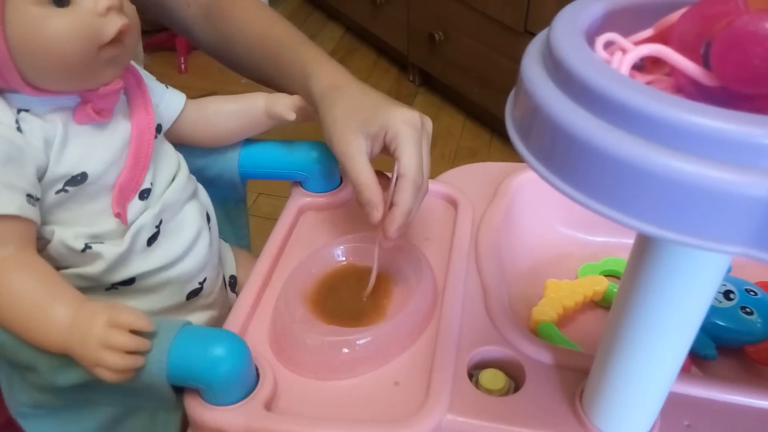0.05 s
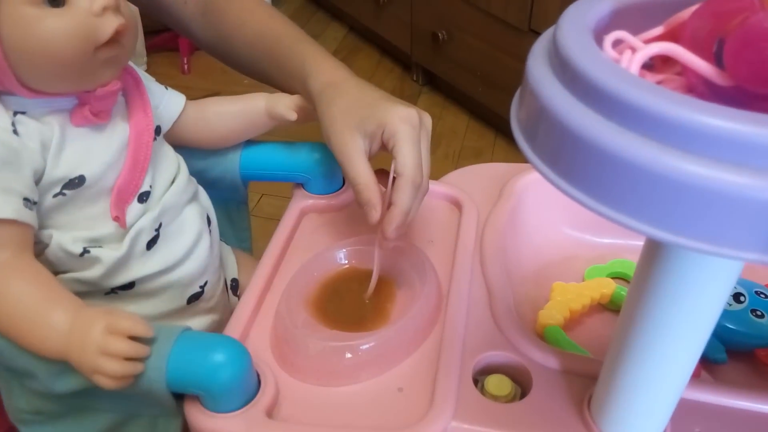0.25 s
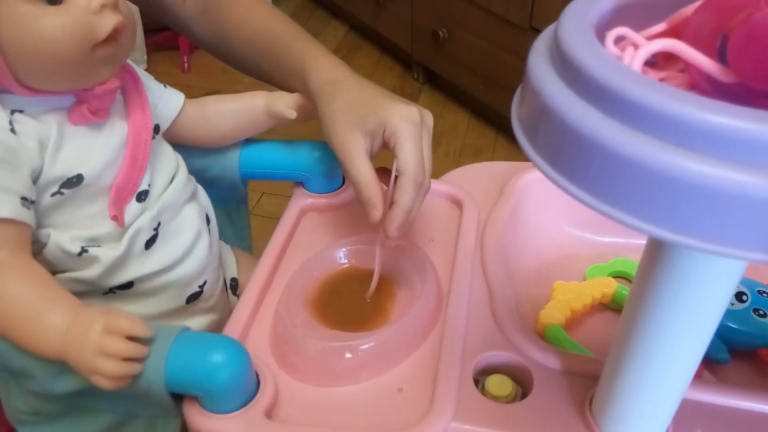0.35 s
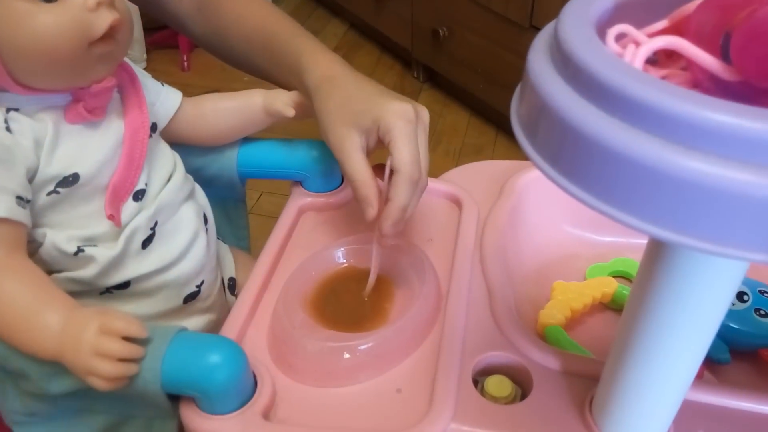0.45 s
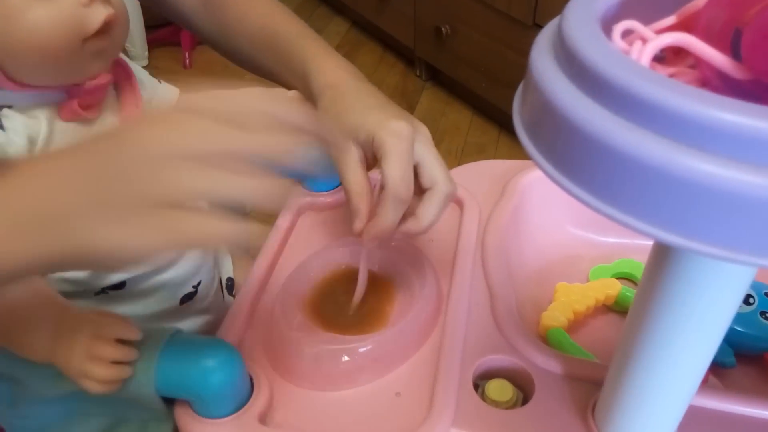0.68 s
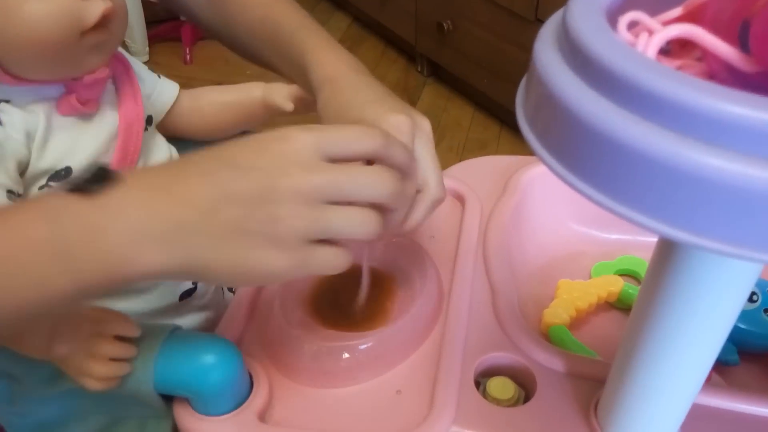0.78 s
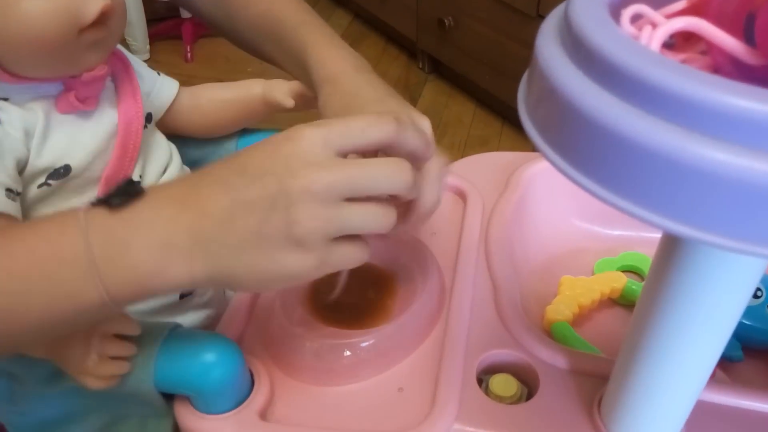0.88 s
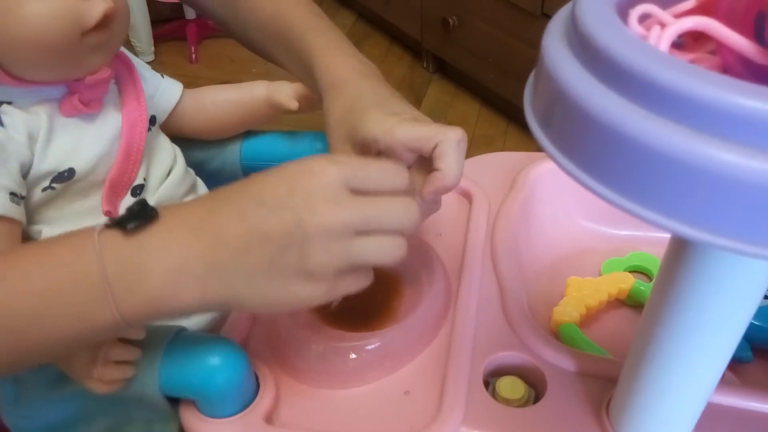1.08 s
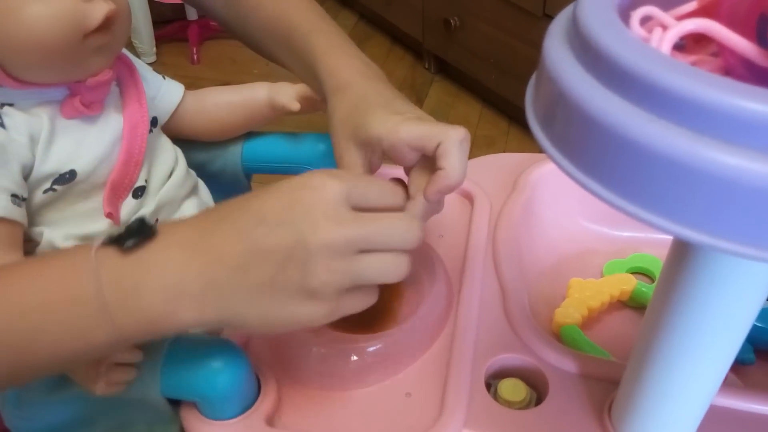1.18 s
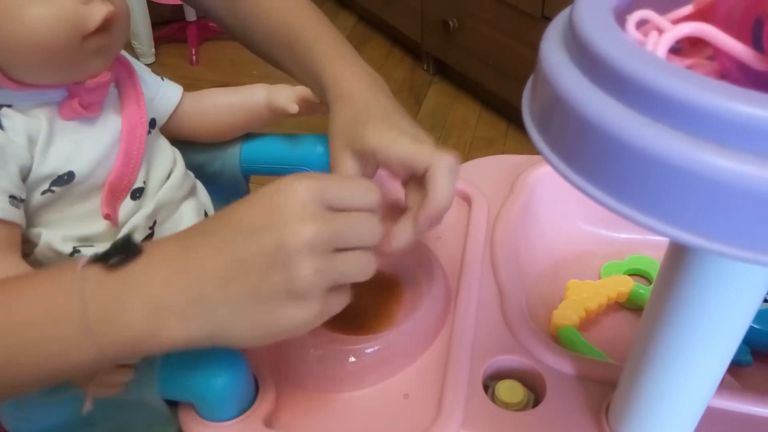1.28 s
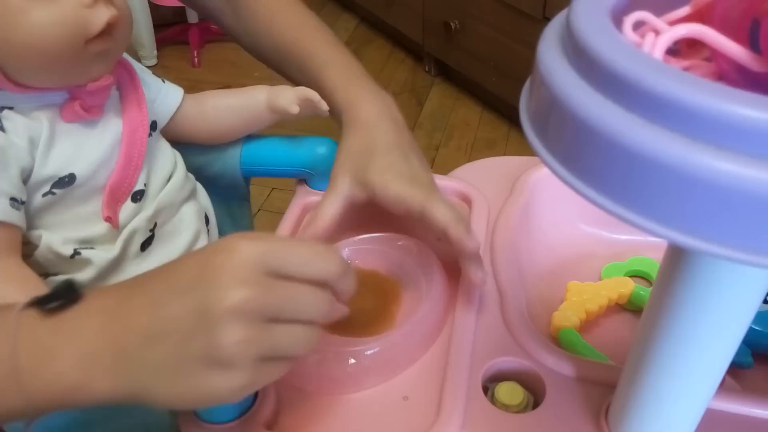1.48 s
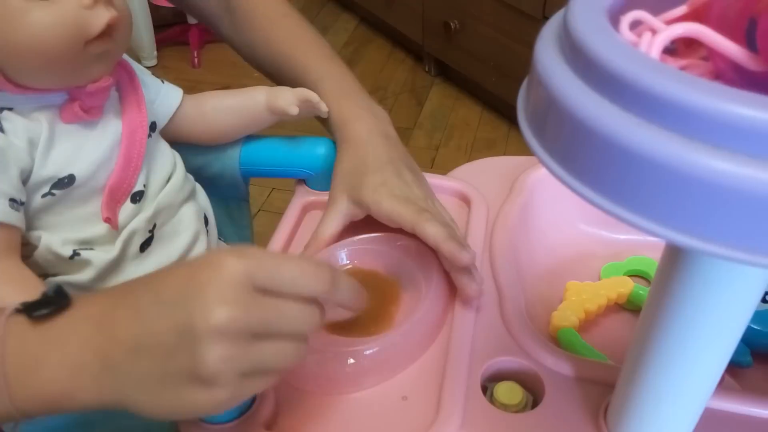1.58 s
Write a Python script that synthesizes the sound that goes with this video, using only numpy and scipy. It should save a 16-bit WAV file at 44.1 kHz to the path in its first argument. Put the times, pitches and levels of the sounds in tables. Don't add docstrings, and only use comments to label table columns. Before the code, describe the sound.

A plastic spoon knocks hard twice in a small plastic bowl, then scrapes and ticks lightly

```python
import sys
import numpy as np
from scipy import signal
from scipy.io import wavfile

SR = 44100
rng = np.random.default_rng(int(sys.argv[2]) if len(sys.argv) > 2 else 0)


def nominal_scale(level):
    x = np.asarray(level, float) / 20
    return 10 ** x


def materialize(psi):
    bounded = np.clip(np.atleast_2d(psi).T, -1, 1)
    quanta = np.round(bounded * 32767).astype(np.int16)
    wavfile.write(sys.argv[1], SR, quanta)


N = 72765

# hz, level_db (per Hz)
ROOM_AIR = [(22, -23), (35, 5), (60, 0), (100, -3), (160, -6), (250, -10.5), (500, -20.5), (1500, -31.5)]
# hz, level_db (per Hz)
MIC_HISS = [(1500, -1), (2500, 5), (4000, 0.5), (5600, 11.5), (7000, 3.5), (9000, -14), (16000, -4.5)]
# hz, likeness (0-1)
STEREO_LIKENESS = [(40, 0.1), (150, 0.7), (500, 0.6), (2000, 0.02), (5000, 0.1), (12000, .0)]
# pitch_hz, width_hz, level_db, wander_hz
WHINE_TONES = [(5616, 39, -74.5, 27), (11250, 35, -80.5, 220), (14050, 99, -88, 22)]
# hz, level_db, t60_s
ROOM_ECHO = [(60, -19, 0.35), (130, -22.5, 0.5), (252, -18, 0.42), (530, -18, 0.32), (750, -18, 0.23),
             (1200, -16.5, 0.28), (3000, -20, 0.41), (6060, -16, 0.34), (9900, -25, 0.17)]
# start_s, length_s, level_db, wall_db (bowl wall against rim)
STROKES = [(-0.01, 0.23, -74.5, -33), (0.312, 0.091, -56, -33), (0.666, 0.067, -69, -17.5),
           (0.741, 0.084, -61.5, -4.5), (0.831, 0.042, -76, -9.5), (0.885, 0.073, -57, -12),
           (0.95, 0.043, -58, -10.5), (0.984, 0.042, -67.5, -17.5), (1.32, 0.23, -79, -2),
           (1.569, 0.11, -77.5, 15), (1.639, 0.019, -76, 12.5)]
# pitch_hz, width_hz, level_db
RIM_PEAKS = [(4700, 197, 2.5), (5960, 510, 1.5), (6460, 480, 0), (7200, 540, 0)]
# pitch_hz, width_hz, level_db
WALL_PEAKS = [(950, 390, 10.5), (1170, 180, -1.5), (1784, 96, 12.5), (2040, 370, 10), (3330, 3300, 7.5)]
# start_s, peak_db, hardness_hz (of the contact), crack_db, pan_db (left over right)
TAPS = [(.2295, -31.5, 855, 12.5, -18), (0.233, -22.5, 1900, 14, -5.5), (0.369, -9.5, 3500, 4.5, -5),
        (0.3704, -26.5, 4016, 6, -3), (0.3722, -17.5, 2520, -33.5, 13), (0.6275, -39, 710, 7, -2),
        (0.8863, -48.5, 800, -19.5, -7.5), (.9145, -65.5, 5050, 3.5, -8), (1.341, -56, 904, -16, -4.5),
        (1.395, -51, 704, -25.5, -6), (1.5826, -57.5, 5900, 10, 9), (1.5838, -47, 6040, 6, 4),
        (1.5855, -42.5, 2000, -21, -12), (1.6345, -47.5, 3000, 3, -11.5)]
# pitch_hz, level_db, t60_s
BOWL_MODES = [(387, -19, 0.0027), (461, 2.5, 0.022), (564, -1, 0.028), (716, -5.5, 0.012), (922, -2, 0.013),
              (1190, -23, 0.012), (1260, -14.5, 0.005), (1746, 6, 0.006), (2000, -3.5, 0.018),
              (2300, -6, 0.017), (2710, -6.5, 0.016), (3075, 2, 0.0069), (4900, -0.5, .004),
              (5370, -4, 0.0023)]
# middle_s, peak_db, pitch_hz, length_s,
# pan_db (left over right)
THUDS = [(0.2323, -13, 460, 0.0049, -6), (0.2337, -8, 205.6, 0.0099, -5.5),
         (0.3746, -18.5, 149, 0.02, -6.5), (.376, -20.5, 522, 0.014, -6.5), (0.411, -33.5, 130, 0.052, -3),
         (0.395, -35, 490.5, 0.04, 4), (0.438, -38, 507.4, 0.051, -1), (0.42, -37, 539, 0.049, -3),
         (0.251, -26, 258, 0.017, 1), (0.284, -45, 90, 0.024, -1), (.05, -55.5, 72, .1, -17),
         (0.118, -53.5, 58, 0.032, -15.5), (.684, -50, 130, 0.01, -3), (0.6182, -43, 240, 0.0098, -2),
         (.455, -24.5, 141, 0.0081, -3.5), (.5155, -31, 144, 0.0096, -10), (0.578, -47.5, 103, 0.072, -6.5),
         (0.6269, -33.5, 178, 0.0079, -9), (0.63, -49, 1190, 0.0075, 4.5), (.634, -44, 500, 0.0073, -8),
         (0.663, -48, 111, 0.029, -9.5), (0.937, -48.5, 62, 0.0337, -12.5),
         (1.1346, -44.5, 308, 0.0067, 16), (1.136, -40, 126.6, 0.011, 21), (1.346, -51.5, 458, 0.01, -7),
         (1.393, -51, 444, 0.018, -7.5), (1.407, -44.5, 230, 0.036, -6), (1.44, -48.5, 219, 0.016, -11.5),
         (1.487, -49, 220.5, 0.043, -10.5), (1.522, -57, 130, 0.021, -30.5), (1.607, -44, 109, 0.0093, -4),
         (1.643, -65, 84.05, 0.014, -47)]
# middle_s, peak_db, pitch_hz, length_s,
# pan_db (left over right)
TICKS_AND_RINGS = [(.2310, -33.5, 5700, .003, -0.5), (0.2363, -22.5, 6500, .003, -0.5), (0.2354, -29, 2760, .004, -3),
                   (.2356, -21.5, 1625, 0.0032, -5.5), (.3705, -25.5, 4900, .004, -10), (0.3719, -34, 3203, .006, -1),
                   (0.413, -47, 1045, .008, 1.5), (.416, -40, 3130, .008, 0), (.6285, -42, 6700, .0018, 1),
                   (0.641, -58, 1140, .006, -12), (0.646, -49, 450, .008, 1), (0.747, -59.5, 4730, .006, -8),
                   (.766, -49, 6250, .005, -2.5), (.770, -61, 2150, .014, -16), (0.776, -49, 6660, .004, -3),
                   (.887, -52.5, 1054, .006, 2.5), (.894, -47.5, 6200, .004, -1.5), (0.911, -52.5, 4560, 0.0094, 5.5),
                   (0.957, -49, 6500, .005, -2.5), (.968, -67.5, 4360, .005, 4.5), (0.992, -69.5, 4700, .008, 3.5),
                   (1.344, -60.5, 1050, 0.0077, -4), (.917, -61, 480, 0.029, -6), (.30, -47.5, 560, 0.019, -3),
                   (0.391, -29, 270, .03, -4.5), (1.417, -52.5, 340, .02, -4.5), (1.408, -62.5, 630, .02, -5.5),
                   (1.49, -62, 487, .015, -1.5), (1.5830, -36, 3000, 0.00027, -4), (1.5840, -36, 3400, 0.00037, -1.5),
                   (1.5855, -44, 1500, 0.00093, 0.5), (1.395, -58, 1800, .001, -5),
                   (0.383, -36.5, 918.5, 0.026, -4.5), (0.395, -41, 708, 0.054, -1.5), (.50, -51.5, 703, 0.062, -3),
                   (0.2329, -29, 1260, 0.005, -4), (1.6352, -50, 3500, 0.00036, -8), (1.636, -67.5, 4660, .003, -5)]


def rms_one(x):
    return x / np.sqrt(np.mean(x ** 2) + 1e-20)


def at_hz(points, hz, column=1):
    points = np.array(points)
    return np.interp(np.log(hz), np.log(points[:, 0]), points[:, column])


def sides(pan_db):
    return nominal_scale(np.array([[pan_db / 2], [-pan_db / 2]]))


def drift(rate_hz):
    pole = np.exp(-2 * np.pi * rate_hz * 40 / SR)
    steps = rng.standard_normal(N // 40 + 2002)
    slow = signal.lfilter([1], [1, -2 * pole, pole * pole], steps)[2000:]
    return np.interp(np.arange(N) / 40, np.arange(len(slow)), rms_one(slow - slow.mean()))


def resonance(x, hz, width_hz):
    r = np.exp(-np.pi * width_hz / SR)
    poles = [1, -2 * r * np.cos(2 * np.pi * hz / SR), r * r]
    return signal.lfilter([(1 - r * r) / 2, 0, (r * r - 1) / 2], poles, x)


def noise_bands():
    edges = 22 * 2 ** np.arange(0, 9.6, 0.5)
    white = rng.standard_normal((2, 2, N))
    for k, (low, high) in enumerate(zip(edges, edges[1:])):
        band = signal.butter(2, [low, high], "band", fs=SR, output="sos")
        mid, side = signal.sosfilt(band, white[k % 2])
        hz = np.sqrt(low * high)
        alike = at_hz(STEREO_LIKENESS, hz)
        yield hz, np.sqrt(1 + alike) * mid + np.sqrt(1 - alike) * side * [[1], [-1]]


def air():
    low, hiss = 0, 0
    together = drift(1.0)
    for hz, band in noise_bands():
        if hz < 1500:
            low = low + nominal_scale(at_hz(ROOM_AIR, hz) + together + 2 * drift(16.0)) * band
        else:
            hiss = hiss + nominal_scale(at_hz(MIC_HISS, hz) + 0.54 * drift(10)) * band
    return nominal_scale(-58.5) * sides(-6) * rms_one(low) + nominal_scale(-69) * sides(-4) * rms_one(hiss)


def whine():
    fuzz_share = 0.35
    wander = np.sin(np.pi * np.arange(N) / SR / 1.9) - 0.6
    out = 0
    for hz, width_hz, db, wander_hz in WHINE_TONES:
        fuzz = drift(width_hz) + 1j * drift(width_hz)
        phase = 2 * np.pi * np.cumsum(hz + wander_hz * wander) / SR
        out = out + nominal_scale(db) * np.real((1 + fuzz_share * fuzz) * np.exp(1j * phase))
    return out * sides(-6.0)


def room(x):
    onset_s, diffuse_hz, diffuse_db = 0.00067, 600, -4
    t = np.arange(N) / SR
    low, high = 0, 0
    for hz, band in noise_bands():
        fade_db = at_hz(ROOM_ECHO, hz) - 21 - 60 * t / at_hz(ROOM_ECHO, hz, column=2)
        decay = nominal_scale(fade_db) * (1 - np.exp(-t / onset_s))
        if hz < diffuse_hz:
            low = low + decay * band
        else:
            broad_band = signal.butter(1, [hz / 1.4, min(hz * 1.4, 20000)], "band", fs=SR)
            source = signal.lfilter(*broad_band, x)
            power = signal.fftconvolve(source ** 2, decay[None] ** 2, axes=1)[:, :N]
            high = high + nominal_scale(diffuse_db) * np.sqrt(np.maximum(power, 0)) * rms_one(band)
    return signal.fftconvolve(x, low, axes=1)[:, :N] + high


def ring_peaks(slips, peaks):
    out = 0
    for hz, width_hz, db in peaks:
        once = resonance(slips, hz, 2 * width_hz)
        out = out + nominal_scale(db) * resonance(once, hz, 2 * width_hz)
    return rms_one(out)


def scrapes():
    slips_per_s, spread_db = 3000, 3
    t = np.arange(N) / SR
    sizes = nominal_scale(spread_db * np.minimum(rng.exponential(1, (2, N)), 4)) * rng.choice([-1, 1], (2, N))
    slips = sizes * (rng.random((2, N)) < slips_per_s / SR) + 1e-18
    rim = ring_peaks(slips, RIM_PEAKS)
    wall = ring_peaks(slips[0, ::-1], WALL_PEAKS)
    out = np.zeros((2, N))
    for s, length, db, wall_db in STROKES:
        corners_s = [s, s + 0.2 * length, s + 0.46 * length, s + length]
        push = np.interp(t, corners_s, [0.041, 0.95, 1.0, 0.0055])
        out += nominal_scale(db + 3.0) * push * (rim + nominal_scale(wall_db) * wall)
    return out * nominal_scale(2 * drift(45)) * sides(-2.5)


def taps():
    scatter_db, crack_s = 3, 0.0008
    crack_reach = 4
    out = np.zeros((2, N + SR))
    t = np.arange(SR // 8) / SR
    hz, mode_db, t60 = np.transpose(BOWL_MODES)[:, :, None]
    signs = (-1) ** np.arange(len(BOWL_MODES))[:, None]
    rings = signs * nominal_scale(mode_db - 60 * t / t60) * np.sin(2 * np.pi * hz * t)
    crack_shape = (t / crack_s) * np.exp(-t / crack_s)
    for s, db, hard_hz, crack_db, pan_db in TAPS:
        luck = rng.standard_normal(len(BOWL_MODES))
        body = nominal_scale(scatter_db * luck - 3.5) @ rings
        body = signal.lfilter(*signal.butter(2, min(hard_hz, 9000), fs=SR), body)
        body = signal.lfilter(*signal.butter(1, 300, "high", fs=SR), body)
        bright = signal.lfilter([1, -0.6], 1, rng.standard_normal(len(t)))
        snap = signal.lfilter(*signal.butter(4, min(crack_reach * hard_hz, 17000), fs=SR), bright)
        crack = nominal_scale(crack_db) * snap * crack_shape
        i = int(s * SR)
        out[:, i:i + len(t)] += nominal_scale(db) * sides(pan_db) * (body + crack)
    return out[:, :N]


def thuds():
    lead_per_db = 0.8
    out = np.zeros((2, N + SR))
    for s, db, hz, length, pan_db in THUDS + TICKS_AND_RINGS:
        t = np.arange(int(length * SR)) / SR - length / 2
        shape = np.cos(np.pi * t / length)
        bend = shape * np.cos(2 * np.pi * hz * t)
        bend = bend - shape * np.mean(bend) / np.mean(shape)
        left, right = nominal_scale(db) * sides(pan_db) * bend
        i = int((s - length / 2) * SR)
        late = i + int(lead_per_db * max(pan_db, 0))
        out[0, i:i + len(t)] += left
        out[1, late:late + len(t)] += right
    return out[:, :N]


def scene():
    close = thuds() + taps() + scrapes()
    close = np.array([close[0], np.roll(close[1], 2)])
    return close + room(close) + air()


def top_cut(x):
    return signal.sosfilt(signal.butter(12, 16500, fs=SR, output="sos"), x)


def record(dry):
    overload = 0.75
    x = signal.sosfilt(signal.butter(2, 41.5, "high", fs=SR, output="sos"), dry)
    x = x - 0.38 * resonance(x, 4170, 550)
    below_port = signal.sosfilt(signal.cheby1(8, 1, 7070, fs=SR, output="sos"), x)
    treble_leak = signal.sosfilt(signal.butter(2, 9375, "high", fs=SR, output="sos"), x)
    x = below_port + nominal_scale(-38.5 + 14.5) * treble_leak
    x = overload * np.tanh(x / overload)
    circuit = signal.sosfilt(signal.butter(4, 15000, fs=SR, output="sos"), rng.standard_normal(x.shape))
    x = x + whine() + nominal_scale(-73.5) * sides(-4) * circuit
    mix = signal.sosfilt(signal.cheby2(12, 70, 17000, fs=SR, output="sos"), x)
    return top_cut(mix)


dry = scene()
out = record(dry)
materialize(out)
```